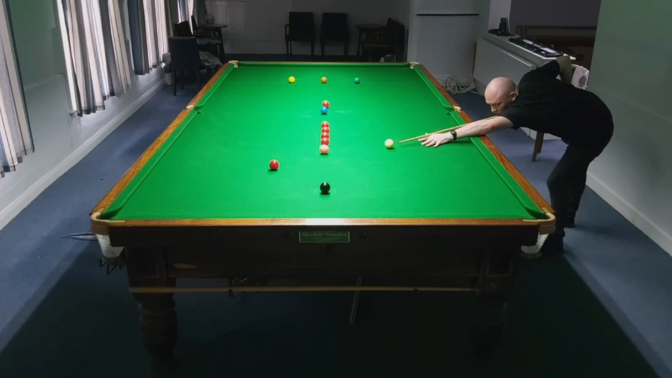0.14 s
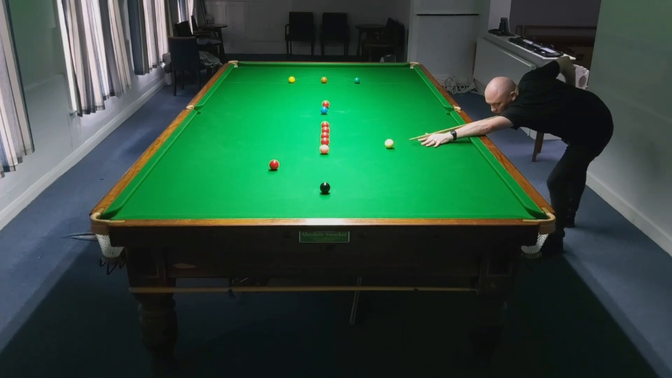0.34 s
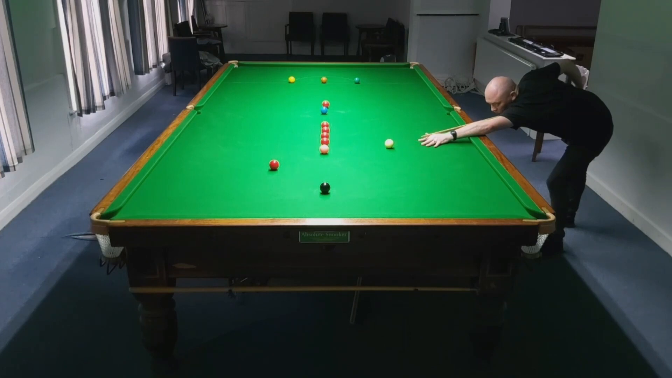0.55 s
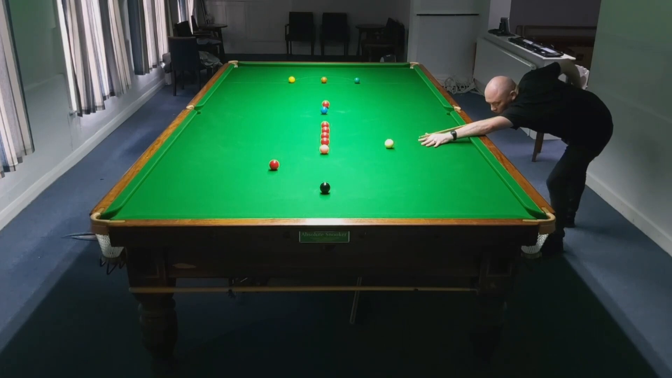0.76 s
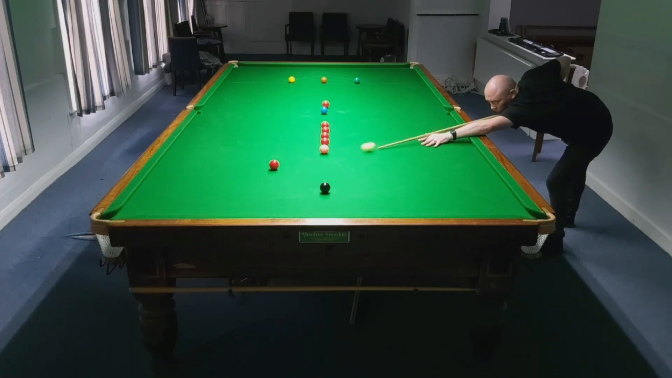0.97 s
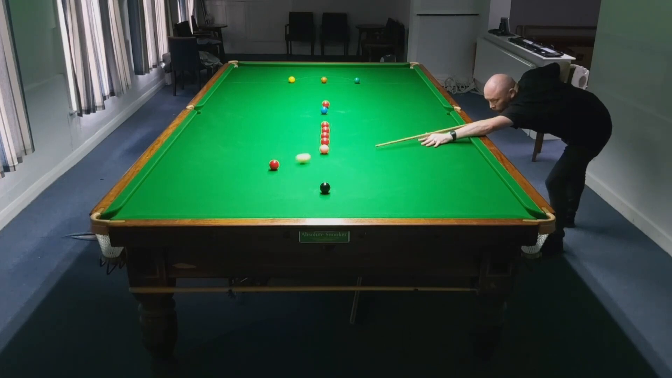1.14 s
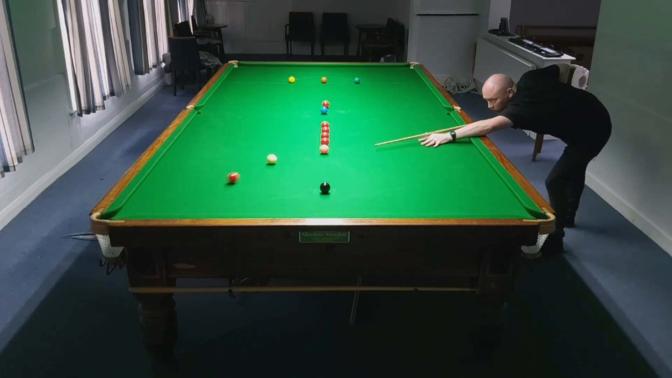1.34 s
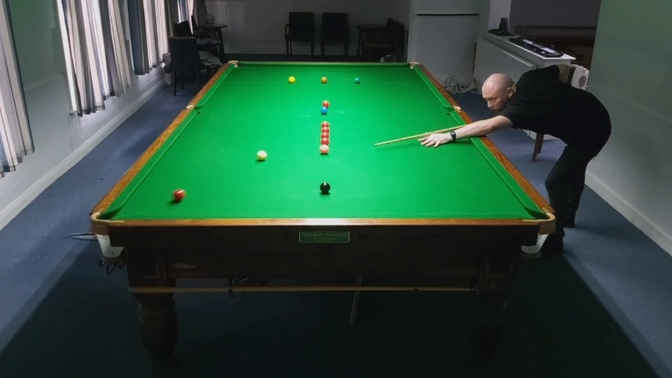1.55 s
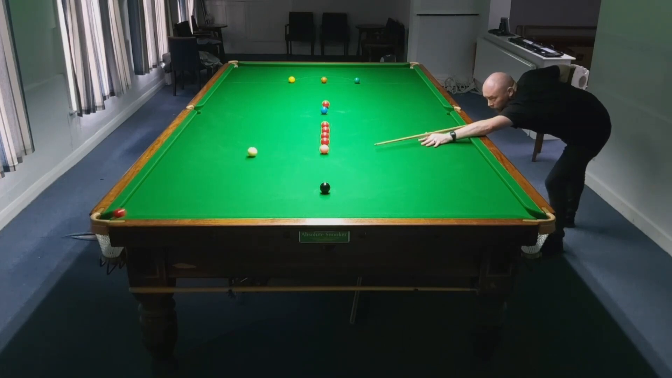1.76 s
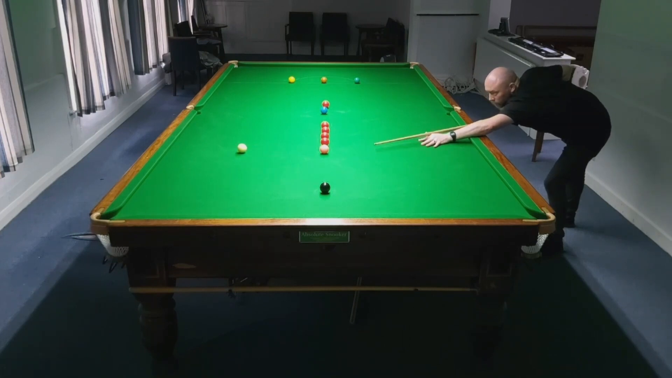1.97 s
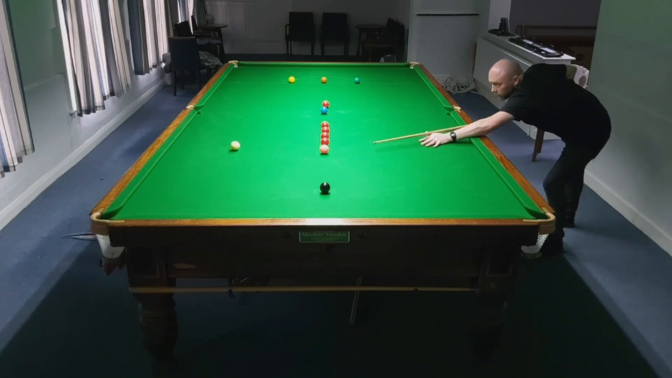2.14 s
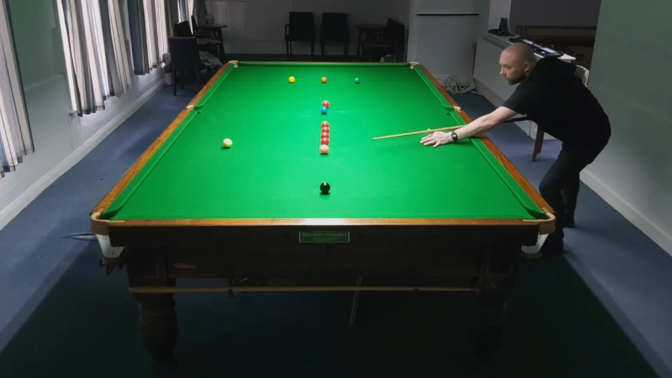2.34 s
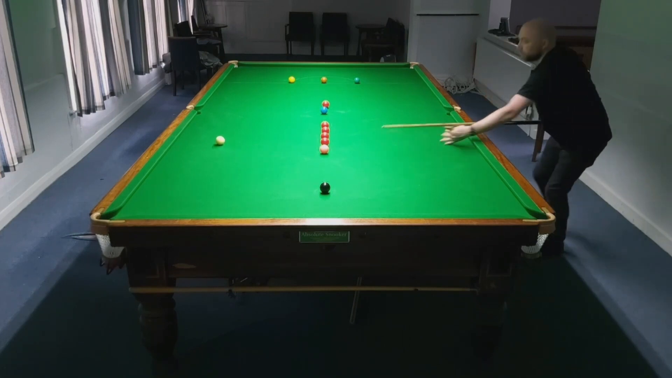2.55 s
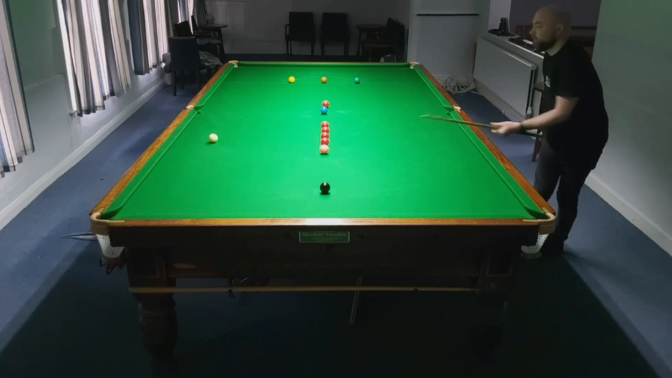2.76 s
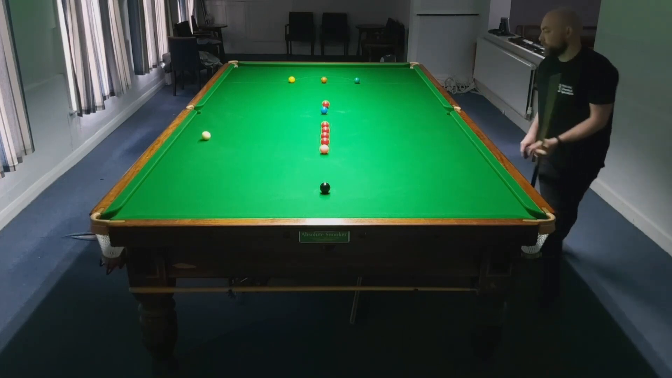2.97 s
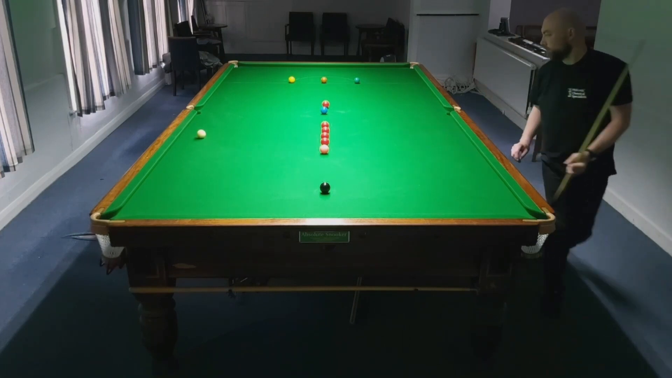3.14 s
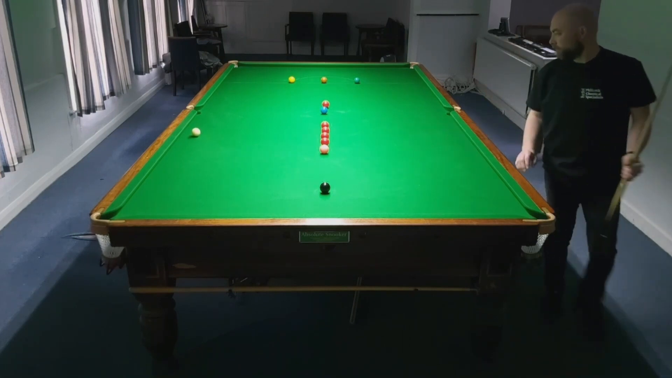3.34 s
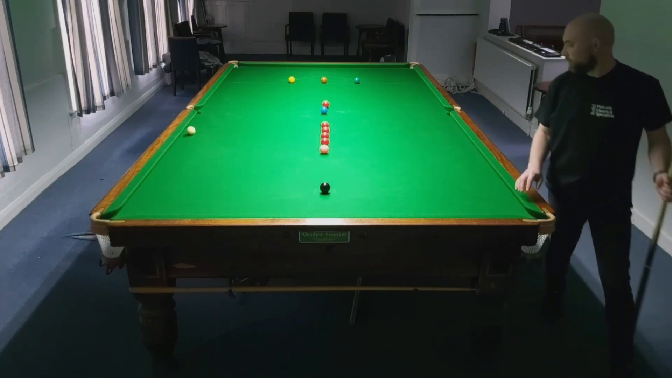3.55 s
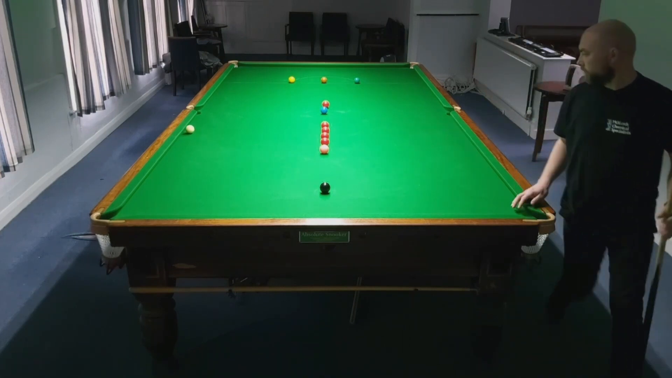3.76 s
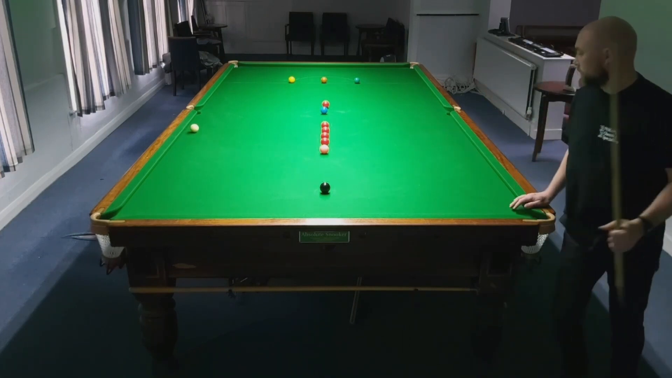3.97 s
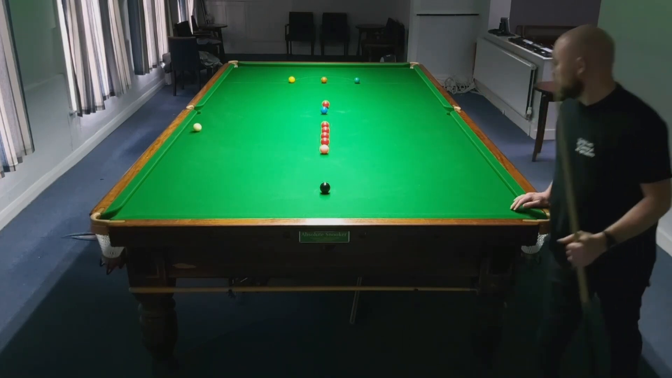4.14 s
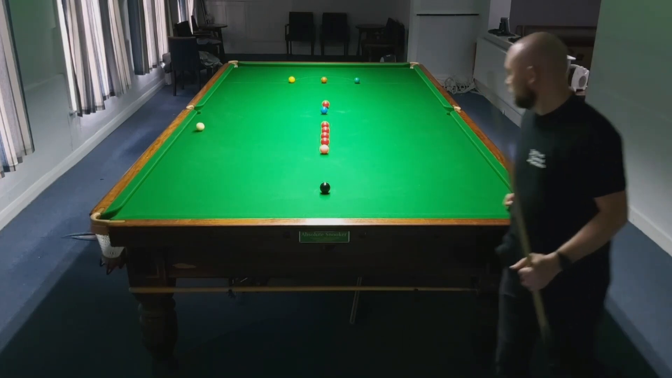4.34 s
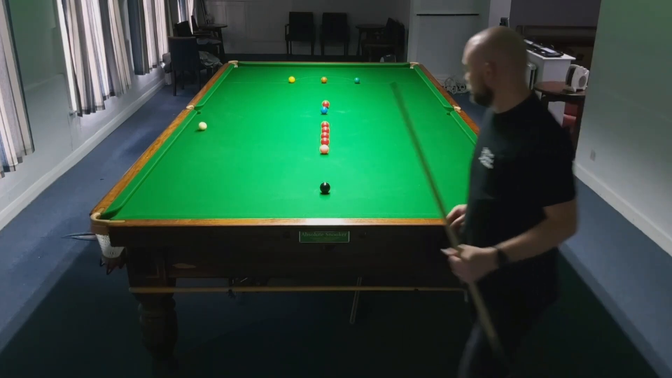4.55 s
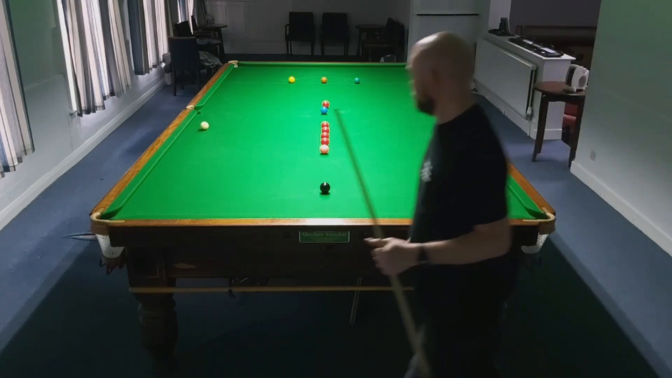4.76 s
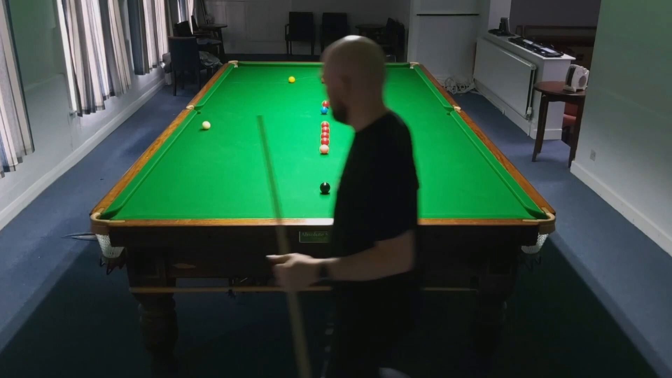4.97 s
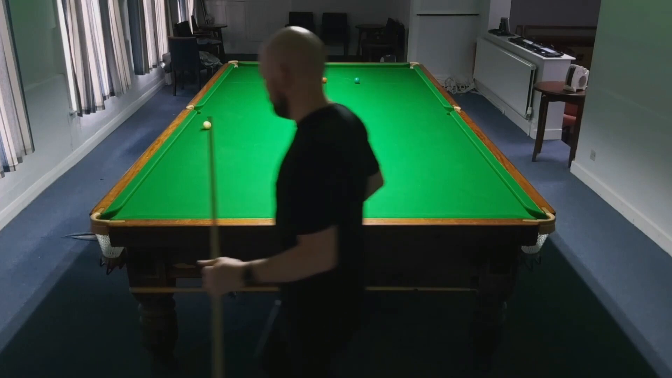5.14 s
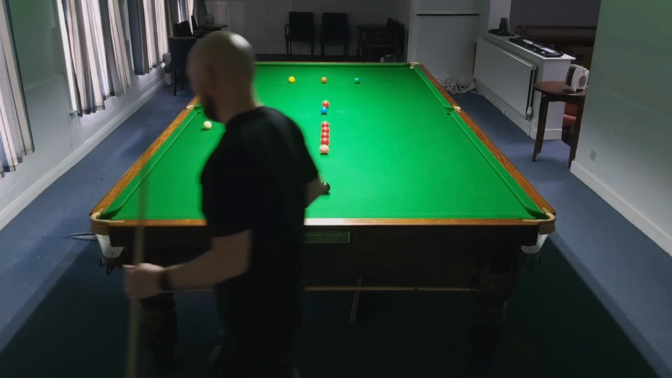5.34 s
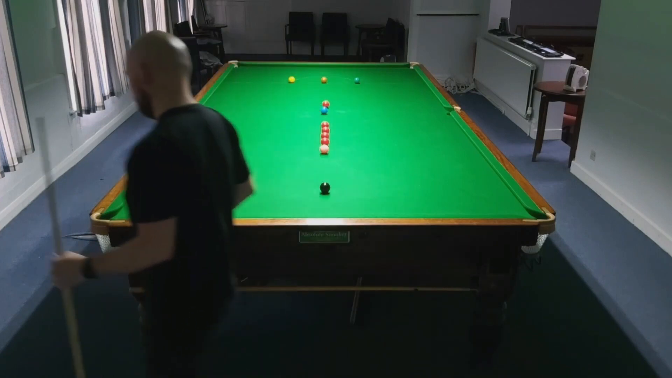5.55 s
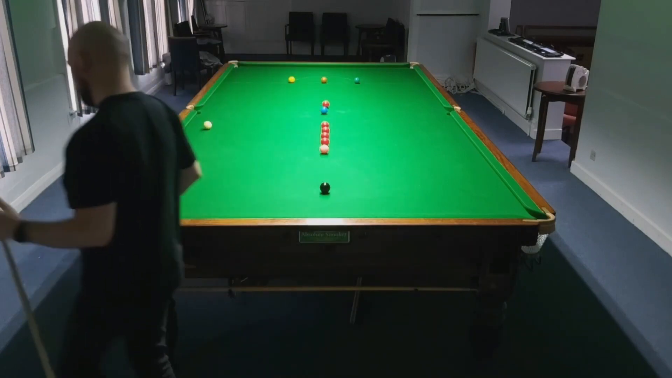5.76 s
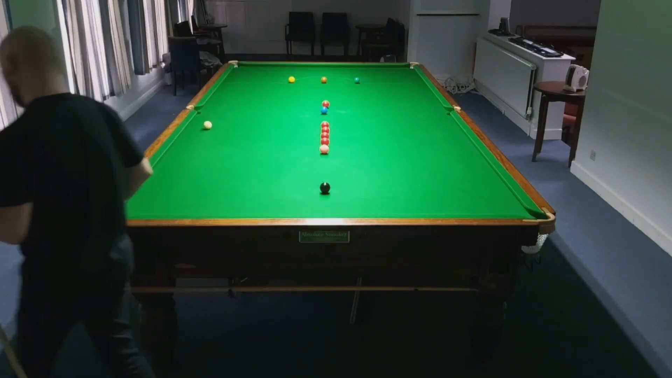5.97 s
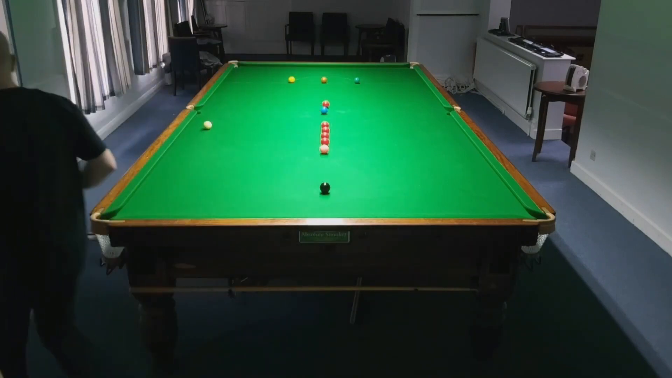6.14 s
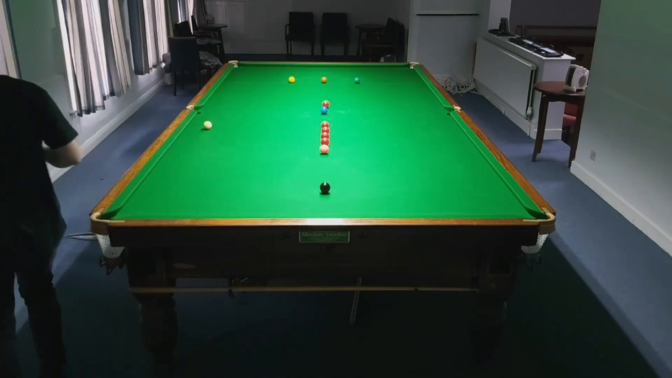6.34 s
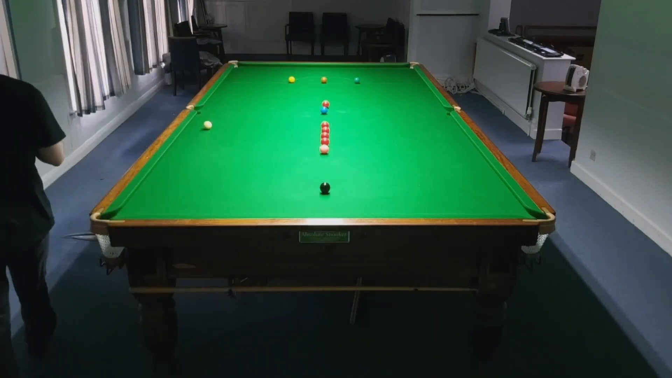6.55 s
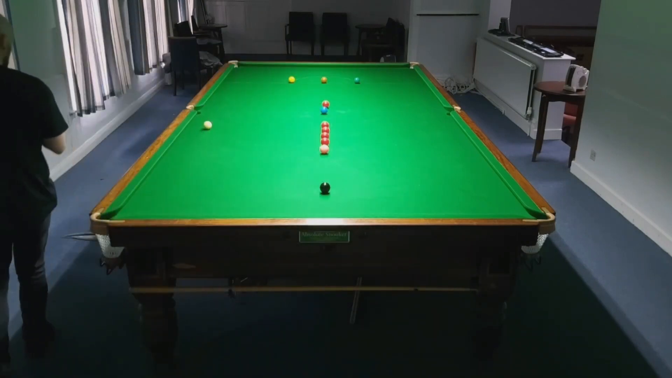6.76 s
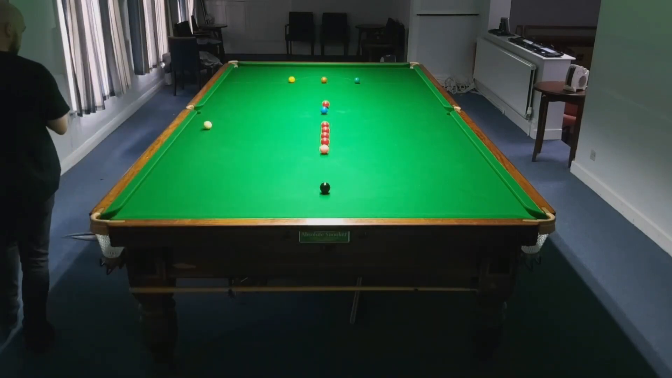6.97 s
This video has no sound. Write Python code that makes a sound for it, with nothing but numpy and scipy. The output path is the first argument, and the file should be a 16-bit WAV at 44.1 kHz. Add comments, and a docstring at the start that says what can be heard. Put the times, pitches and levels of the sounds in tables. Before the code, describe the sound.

In a quiet room, a wooden cue knocks a snooker ball, which rolls briefly before two sharp clacks ring out. A ball thuds into a pocket and clicks lightly down into its wire rail. Footsteps then start softly on a hollow carpeted floor and grow louder as they pass close to the microphone, with scuffing soles and rustling clothes.

```python
"""A snooker shot in a quiet room

The cue knocks and rings, balls roll over the slate and clack in brief elastic impacts, and a red
thuds into the corner pocket and clicks down into its rail. The player then walks round the table,
past the microphone: steps thump a carpeted hollow floor, and friction makes soles scuff and clothes
rustle. A soft noise gate hushes the pauses."""
import sys
import numpy as np
from scipy import signal
from scipy.fft import rfft, irfft, next_fast_len
from scipy.io import wavfile
from scipy.ndimage import map_coordinates

SR = 44100
rng = np.random.default_rng(int(sys.argv[2]) if len(sys.argv) > 2 else 0)


def put_to_file(sound):
    """Save the sound as 16-bit audio at rate SR, in the file named by the first command-line argument."""
    columns = np.atleast_2d(sound).T  # one column per channel
    safe = np.clip(columns, -1, 1)
    whole_steps = np.round(safe * 32767)
    wavfile.write(sys.argv[1], SR, whole_steps.astype(np.int16))


N = 308690

T = np.arange(32768) / SR  # time axis of one short sound, in seconds

# Knocks of the cue. Each row: start in seconds, level in dB, ring against knock in dB,
# contact length in seconds, reverberation in dB.
CUE_KNOCKS = [(0.785, -33.5, -23, 0.088, -5), (0.792, -25, -11.5, 0.0097, 2.5),
              (0.8748, -20, -1.5, 0.017, 7.5)]
# Response of the cue's wood. Each row: frequency in Hz, gain in dB.
CUE_WOOD = [(50, -31), (170, 3), (350, 1), (580, -1.5), (800, -8), (1050, -2), (1600, 1), (1850, -8),
            (2300, -1.5), (2900, 2.5), (4300, -5.5), (5700, -12.5), (8800, -14.5), (11000, -32.5),
            (15500, -44.5)]
# Modes of shaft and ferrule. Each row: frequency in Hz, relative level in dB, T60 in seconds.
CUE_MODES = [(1551, -19.5, .3), (2680, -1, 0.38), (2980, -10.5, 0.3), (3500, -5, 0.022), (3950, 0, .04),
             (4576, -6, .05), (5850, -7, .03), (6850, -12, .05), (8048, -7.5, .03), (8900, -8.5, .015),
             (11400, -4.5, .025), (12100, -15, 0.0067)]


def cue():
    """Impact excitation: the tip knocks, and shaft and ferrule ring on in their natural modes."""
    out = np.zeros(N)
    for start, db, ring_db, length, wet_db in CUE_KNOCKS:
        knock = even(coloured(heard(burst(length), wet_db), CUE_WOOD))
        # the ring swells while the tip still presses on the ball
        press = 1 - np.exp(-T / 0.001) + 12 * (T / 0.0017) * np.exp(-T / 0.0047)
        ringing = even(heard(press * ring(CUE_MODES), wet_db=-2))
        add(out, start, amp(db) * (knock + amp(ring_db) * ringing))
    return out


# Ball against ball, hardest first. Each row: start in seconds, level in dB, reverberation in dB.
CLACKS = [(1.0605, -13, 2.5), (1.176, -15, 16), (2.234, -38, 0.5)]
# Reflections off cushions and walls. Each row: arrival in seconds, peak level in dB.
REFLECTIONS = [(1.0683, 2), (1.0719, 1.5), (1.0826, -10), (1.0943, -3), (1.1817, -4), (1.1949, -11.5),
               (1.196, -2.5), (2.2417, -28)]
# Spectrum of a clack. Each row: frequency in Hz, gain in dB.
BALL = [(150, -24), (800, -19.5), (1300, -8), (2000, 0), (2900, 2.5), (3800, -9.5), (4700, -13.5),
        (6000, -38.5), (8000, -34.5), (9200, -44.5), (10700, -35), (12500, -49.5), (14500, -38),
        (16000, -56.5)]


def balls():
    """Elastic collision: hard balls give one very short pulse, which cushions and walls reflect."""
    out = np.zeros(N)
    pulse = coloured(echo(delay=0, db=0), BALL, tilt_db=2.5)
    for arrival, db in REFLECTIONS:
        add(out, arrival, amp(db) * pulse / np.abs(pulse).max())
    hardest_db = CLACKS[0][1]
    for start, db, wet_db in CLACKS:
        tilt_db = 0.08 * (db - hardest_db)  # a gentler clack has less treble
        paths = room(wet_db) + echo(delay=0, db=-9.5)  # extra direct sound adds snap
        add(out, start, amp(db) * even(coloured(paths, BALL, tilt_db)))
    return out


# Rolls over the slate, then along the rail. Each row: start and stop in seconds,
# relative levels in dB of the rolling and of the table's deep rumble.
ROLLS = [(0.885, 1.17, -25, -51.5), (1.6, 2.293, -36.5, -46.5)]
# Response of the slate. Each row: frequency in Hz, gain in dB.
SLATE = [(35, -45), (60, -17), (85, -5), (129, -11.5), (213, -2.5), (247, -8), (298, -6), (796, -24),
         (899, -23), (1500, -25), (1950, -47), (3300, -120)]


def rolling():
    """Rolling noise follows speed: it builds, sags as the ball slows and dies when it stops."""
    rise_s, slowing_db_per_s, release_db_per_s = 0.084, 14.5, 70.5
    out = np.zeros(N)
    for start, stop, db, deep_db in ROLLS:
        age = np.maximum(np.arange(N) / SR - start, 0)
        since_stop = np.maximum(age - (stop - start), 0)
        fall_db = slowing_db_per_s * age + release_db_per_s * since_stop
        speed = amp(-fall_db) * (1 - np.exp(-age / rise_s))
        out += speed * (amp(db) * noise(SLATE) + amp(deep_db) * noise(RUMBLE))
    return out


# Dull blows on cushion and pocket. Each row: start in seconds, relative level in dB, pitch in Hz.
BUMPS = [(1.552, -4, 365), (1.583, -14.5, 388), (1.607, -34.5, 393), (1.634, -17.5, 156), (1.975, -20, 244)]
# Knocks on the jaws. Each row: start in seconds, level in dB, low-pass corner in Hz.
JAW_KNOCKS = [(1.54, -24, 1200), (1.586, -22.5, 2046), (1.609, -27.5, 4600)]
# Response of the jaws' wood. Each row: frequency in Hz, gain in dB.
JAW_WOOD = [(50, -35), (170, -2.5), (260, -10), (430, -2), (560, -7.5), (720, -17), (1050, -11),
            (1230, -14), (1480, -9), (2100, -13), (2700, -13.5), (3600, -23), (6000, -34), (7500, -18),
            (15000, -60)]


def pocket():
    """Cushioned impact: the red thuds into the jaws, whose soft rubber takes the treble off a blow."""
    out = np.zeros(N)
    for start, db, hz in BUMPS:
        add(out, start, amp(db - 14) * thump(hz, cycles=1.47, wet_db=-3))
    for start, db, corner_hz in JAW_KNOCKS:
        rubber = signal.butter(4, corner_hz, fs=SR, output="sos")
        blow = signal.sosfilt(rubber, heard(scrape(length=0.047, grain_db=3), wet_db=4))
        add(out, start, amp(db) * even(coloured(blow, JAW_WOOD)))
    return out


# Clicks in net and rail. Each row: start in seconds, level in dB, tilt in dB per octave.
RAIL_CLICKS = [(1.661, -51.5, -1), (1.79, -38.5, 0), (1.892, -42.5, -2.5), (1.9934, -33, -4.5),
               (1.997, -29.5, 1.5), (2.113, -46.5, -10.5), (2.316, -49, -5.5), (2.355, -55, -3.5)]
# Response of the rail. Each row: frequency in Hz, gain in dB.
RAIL = [(350, -22.5), (600, -10.5), (736, -12.5), (1490, 0), (1990, 1), (2160, 2.5), (3710, 3), (7240, 1),
        (9500, -11), (11300, -9), (15500, -31)]
# Modes of the wire. Each row: frequency in Hz, relative level in dB, T60 in seconds.
RAIL_MODES = [(2690, -1, 0.24), (3170, 3, 0.18), (4420, 0.5, 0.14)]


def pocket_rail():
    """Free vibration: the red rattles through the net and leaves the wire rail ringing faintly."""
    out = np.zeros(N)
    for start, db, tilt_db in RAIL_CLICKS:
        add(out, start, amp(db) * even(coloured(heard(burst(0.04), wet_db=2), RAIL, tilt_db)))
    add(out, 2.316, amp(-54) * even(heard(ring(RAIL_MODES), wet_db=-1.5)))
    return out


# Steps. Each row: start in seconds, relative heel level in dB, heel pitch in Hz, heel-to-forefoot time
# in seconds, relative forefoot level in dB, forefoot pitch in Hz, board noise in dB, floor flex in dB.
STEPS = [(0.0, -37.5, 191, 0.027, -38, 105, -62.5, -80), (2.823, -30.5, 172, 0.16, -38.5, 323, -55, -50.5),
         (3.333, -33, 130.3, 0.11, -21.5, 185, -60, -41), (3.508, -32.5, 149.4, 0.14, -31.5, 294, -39, -56),
         (4.054, -19.5, 136, 0.087, -22, 172, -30.5, -52), (4.666, -16, 132, 0.075, -24, 170, -30, -46),
         (5.127, -13, 275, 0.14, -27.5, 149, -37.5, -35.5), (5.728, -30, 310, 0.13, -22.5, 314, -29, -57),
         (6.439, -20, 320, 0.008, -23.5, 169.5, -34, -52)]
# Sharp heel taps. Each row: start in seconds, level in dB, reverberation in dB.
HEEL_TAPS = [(4.1418, -32, 5), (4.412, -26, -3.5), (4.543, -28, -1), (4.819, -36.5, 6), (5.711, -28.5, 4),
             (6.4364, -33, 6)]
# Spectrum of a tap. Each row: frequency in Hz, gain in dB.
HEEL = [(30, -48), (70, 8.5), (280, 10.5), (500, 7), (850, 1), (1200, 3.5), (2400, -4.5), (4400, -15),
        (8000, -29), (12000, -47), (16000, -66)]


def footsteps():
    """Impact sound: heel and forefoot drive the hollow floor, and heels tap with a near echo."""
    out = np.zeros(N)
    for start, heel_db, heel_hz, roll_s, fore_db, fore_hz, *_ in STEPS:
        add(out, start, amp(heel_db - 10.5) * thump(heel_hz, cycles=0.92, wet_db=-3.5))
        add(out, start + roll_s, amp(fore_db - 6.5) * thump(fore_hz, cycles=1, wet_db=-8))
    for start, db, wet_db in HEEL_TAPS:
        paths = room(wet_db) + echo(delay=0.0079, db=-1.6)
        add(out, start, amp(db) * even(coloured(paths, HEEL)))
    return out


# Scuffs. Each row: start in seconds, relative levels of sole and fabric in dB, length in seconds.
SCUFFS = [(2.669, -48.5, -64, 0.13), (2.958, -66, -45, 0.14), (3.558, -59, -64, 0.03),
          (3.592, -54, -45.5, 0.044), (4.0645, -43.5, -47, 0.09), (4.14, -38, -49, 0.03),
          (4.207, -38.5, -35, 0.025), (4.306, -35, -34.5, 0.11), (4.335, -30.5, -32, 0.076),
          (4.673, -37, -45, 0.033), (4.7212, -29.5, -36, 0.021), (4.764, -37, -54, 0.036),
          (4.819, -31.5, -48, 0.026), (4.845, -39, -60, 0.04), (4.874, -41, -45, 0.029),
          (4.9737, -36.5, -40, 0.037), (5.125, -46, -36, 0.08), (5.334, -40, -57, 0.09),
          (5.477, -39, -50, 0.029), (5.522, -40, -48, 0.059), (5.618, -34.5, -79, 0.16),
          (5.704, -47, -38, 0.048), (5.847, -38, -55, 0.027), (5.891, -36, -39.5, 0.035),
          (6.431, -33.5, -71, 0.072), (6.755, -34.5, -66, 0.095)]
# Friction spectra of sole and fabric. Each row: frequency in Hz, gain in dB.
SOLE = [(150, -34), (350, -9.5), (550, 2), (800, -9), (1500, -7.5), (2500, -6), (4000, -15), (6000, -29),
        (12000, -80)]
FABRIC = [(500, -81), (2000, -6), (3800, 3.5), (5500, 2.5), (8000, -1), (9400, -15), (11200, -8.5),
          (13000, -42), (15500, -24)]


def scuffing():
    """Sliding friction: soles give a dull scuff and fabric a brighter, grainier one."""
    out = np.zeros(N)
    for start, sole_db, fabric_db, length in SCUFFS:
        add(out, start, amp(sole_db - 4.5) * scuff(SOLE, length, tick_db=-5, grain_db=4))
        add(out, start, amp(fabric_db - 9.5) * scuff(FABRIC, length, tick_db=-8, grain_db=9.5))
    return out


def scuff(spectrum, length, tick_db, grain_db):
    """Stick and slip: surfaces tick as they first catch, then give a short grainy rub."""
    rub = scrape(length, grain_db)
    contact = rub / np.linalg.norm(rub) + amp(tick_db) * burst(0.01)
    in_room = heard(contact, wet_db=-1)
    varied = [(hz, db - 2 * rng.standard_normal()) for hz, db in spectrum]  # no two alike
    return even(coloured(in_room, varied))


# The player's movement. Each row: time in seconds, relative levels of rustle and floor murmur in dB.
MOVEMENT = [(2.6, -68, -63), (2.93, -51, -47.5), (3.07, -52.5, -49.5), (3.27, -71.5, -61.5),
            (3.6, -47, -41.5), (3.88, -68.5, -61.5), (4.08, -49, -45), (4.25, -62, -54), (4.38, -50, -39),
            (4.74, -40, -39), (5.12, -48.5, -41.5), (5.56, -52, -42.5), (5.76, -48, -51),
            (5.92, -47.5, -33), (6.2, -64, -42.5), (6.42, -58.5, -50.5), (6.62, -48.5, -41),
            (7.0, -68, -44.5)]
# Response of the boards. Each row: frequency in Hz, gain in dB.
BOARDS = [(29, -16), (50, -6), (119, 2), (256, -3), (299, 1.5), (386, -8), (542, -15.5), (900, -26.5),
          (1170, -25.5), (1980, -120)]


def floorboards():
    """Forced vibration: the boards murmur and flex under a load that peaks as each forefoot lands."""
    rise_db_per_s, hold_s, release_db_per_s = 252, 0.044, 87
    starts, _, _, roll_s, _, _, boards_db, flex_db = np.transpose(STEPS)
    _, murmur_db = curves(MOVEMENT)
    age = np.arange(N) / SR - (starts + roll_s)[:, None]  # one row per step
    load = amp(-rise_db_per_s * np.maximum(-age, 0) - release_db_per_s * np.maximum(age - hold_s, 0))
    level = np.hypot(amp(boards_db) @ load, amp(murmur_db + 1))
    murmur = level * amp(2.2 * wobble(rate=25)) * noise(BOARDS)
    flexing = (amp(flex_db) @ load) * noise(RUMBLE)
    return murmur + flexing


# Swishes of the trouser legs. Each row: start in seconds, level in dB, length in seconds.
SWISHES = [(5.126, -56.5, 0.51), (5.72, -50.5, 0.11)]
# Spectra of rustle and swish. Each row: frequency in Hz, gain in dB.
RUSTLE = [(200, -20.5), (500, -6), (900, -5), (2200, -9), (4200, -17), (6500, -33.5), (12000, -53)]
SWISH = [(3000, 0), (7000, -2.5), (11000, -12.5), (13000, -23), (15500, -33)]


def clothes():
    """Friction noise: moving cloth rustles in small uneven catches, and trouser legs swish."""
    rustle_db, _ = curves(MOVEMENT)
    catches = unit(amp(3.3 * wobble(rate=45) + 2.3 * wobble(rate=460)))  # slow and fine swings in dB
    cloth = amp(-3) * noise(RUSTLE) + amp(-19.5) * noise(FABRIC)
    out = signal.fftconvolve(amp(rustle_db - 1.5) * catches * cloth, room(wet_db=-3.5))[:N]
    for start, db, length in SWISHES:
        rub = heard(scrape(length, grain_db=1), wet_db=14.5)
        add(out, start, amp(db) * even(coloured(rub, SWISH)))
    return out


# Spectra of deep structural rumble and of hiss. Each row: frequency in Hz, gain in dB.
RUMBLE = [(8, -54), (18, -5), (28, -1.5), (50, -8), (75, -4.5), (110, -24), (250, -80)]
HISS = [(30, -2.5), (300, 10), (2000, 3), (6000, -3.5), (11000, -1), (15500, -10.5)]


def background():
    """Ambient noise: the building's deep rumble lies under a steady faint hiss."""
    return amp(-54.5) * noise(RUMBLE) + amp(-75) * noise(HISS)


# The room's tail. Each row: frequency in Hz, T60 in seconds, relative level in dB.
ROOM = [(100, 0.69, -0.5), (400, .5, 0.5), (1200, 0.59, -2), (2760, 0.53, -3), (6060, 0.36, -3),
        (12000, 0.25, 3)]


def room(wet_db, build_s=0.0027):
    """Impulse response: direct sound, then a diffuse tail at wet_db + 1 dB whose treble dies first."""
    hz, t, bands = signal.stft(rng.standard_normal(len(T)), SR, nperseg=256)
    t60 = along([(f, life) for f, life, _ in ROOM], hz)[:, None]
    tail_db = along([(f, db) for f, _, db in ROOM], hz)[:, None]
    tail = signal.istft(bands * amp(tail_db - 60 * t / t60), SR)[1][:len(T)]
    tail *= 1 - np.exp(-T / build_s)
    return signal.unit_impulse(len(T)) + amp(wet_db + 1) * tail / np.linalg.norm(tail)


def heard(x, wet_db):
    """Convolution with the room's response gives a short sound its reverberation."""
    return signal.fftconvolve(x, room(wet_db))[:len(T)]


def echo(delay, db):
    """A single sound path is an impulse, delayed by its travel time in seconds."""
    return amp(db) * signal.unit_impulse(len(T), round(delay * SR))


def thump(hz, cycles, wet_db):
    """Heavy damping: a softly struck panel swells and dies within a few cycles."""
    age = hz * T / cycles
    return even(heard(age ** 2 * np.exp(-2 * age) * np.sin(2 * np.pi * hz * T), wet_db))


def burst(t60):
    """Broadband excitation: a rough contact gives decaying noise of energy 1."""
    x = rng.standard_normal(len(T)) * amp(-60 * T / t60)
    return x / np.linalg.norm(x)


def scrape(length, grain_db):
    """Friction in small catches modulates a noise that swells quickly and fades."""
    age = T / length
    catches = amp(grain_db * np.repeat(rng.standard_normal(len(T) // 32), 32))
    return rng.standard_normal(len(T)) * catches * (1 - np.exp(-12 * age)) * amp(-60 * age)


def ring(modes):
    """Modal superposition: decaying partials add at random phases."""
    return sum(amp(db - 60 * T / t60) * np.sin(2 * np.pi * (hz * T + rng.random()))
               for hz, db, t60 in modes)


def coloured(x, spectrum, tilt_db=0):
    """A body acts as a minimum-phase filter, here tilted by tilt_db per octave above 500 Hz."""
    size = 2 * len(T)
    hz = np.fft.rfftfreq(size, 1 / SR)
    gain_db = along(spectrum, hz) + tilt_db * np.log2(np.maximum(hz, 500) / 500)
    cepstrum = irfft(np.log(amp(gain_db)))
    # folding the cepstrum onto positive time makes the filter causal
    cepstrum[1:size // 2] *= 2
    cepstrum[size // 2 + 1:] = 0
    return irfft(rfft(x, size) * np.exp(rfft(cepstrum)))[:len(T)]


def noise(spectrum):
    """Spectral shaping turns white noise into steady coloured noise of rms 1."""
    size = next_fast_len(N + SR // 4)
    gain = amp(along(spectrum, np.fft.rfftfreq(size, 1 / SR)))
    return unit(irfft(rfft(rng.standard_normal(size)) * gain, size)[:N])


def wobble(rate):
    """A smooth random curve, rate knots a second."""
    return map_coordinates(rng.standard_normal(int(N * rate / SR) + 4), [np.arange(N) * rate / SR])


def amp(db):
    """Decibels to gain."""
    return 10 ** (np.asarray(db) / 20)


def unit(x):
    """Scale to rms 1."""
    return x / np.sqrt(np.mean(x ** 2) + 1e-30)


def even(x, size=1764):
    """Scale a blow to rms 1 over its first 40 ms."""
    return x / np.sqrt(np.mean(x[:size] ** 2) + 1e-30)


def along(points, hz):
    """(Hz, value) points read on a log axis."""
    f, v = np.transpose(points)
    return np.interp(np.log(hz + 1), np.log(f + 1), v)


def curves(rows):
    """Interpolation in time: one value per sample for each column of levels."""
    times, *levels = np.transpose(rows)
    return [np.interp(np.arange(N) / SR, times, db, left=-120) for db in levels]


def add(track, s, sound):
    """Mix a sound in at s seconds."""
    start = max(round(s * SR), 0)
    track[start:start + len(sound)] += sound[:N - start]


def lowpass(x, corner_hz, order):
    """A zero-phase filter keeps what lies below the corner."""
    m = next_fast_len(N + SR // 4)
    return irfft(rfft(x, m) / (1 + (np.fft.rfftfreq(m, 1 / SR) / corner_hz) ** order), m)[..., :N]


def gate(key, threshold_db, slope, smoothing_s):
    """Downward expansion: the further the key sinks below the threshold, the lower the gain."""
    keep = np.exp(-1 / (smoothing_s * SR))
    level = np.sqrt(signal.lfilter([1 - keep], [1, -keep], key ** 2))
    return np.minimum(level / amp(threshold_db), 1) ** slope


def scene():
    """Superposition: all sources add at one microphone."""
    shot = cue() + rolling() + balls() + pocket() + pocket_rail()
    player = footsteps() + scuffing() + floorboards() + clothes()
    return (shot + player + background())[None]


def record(dry):
    """Gating hushes the pauses, the bass most; saturation rounds peaks; a low-pass limits the band."""
    key = dry - lowpass(dry, corner_hz=159, order=10)
    bass = lowpass(dry, corner_hz=95, order=10)
    gated = ((dry - bass) * gate(key, threshold_db=-51, slope=0.84, smoothing_s=0.024)
             + bass * gate(key, threshold_db=-50, slope=1.5, smoothing_s=0.023))
    rounded = gated / (1 + np.abs(gated) ** 6) ** (1 / 6)
    return lowpass(rounded, corner_hz=15900, order=160)


dry = scene()
out = record(dry)
put_to_file(out)
```